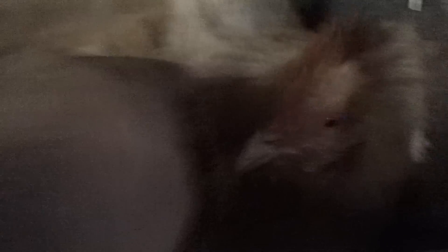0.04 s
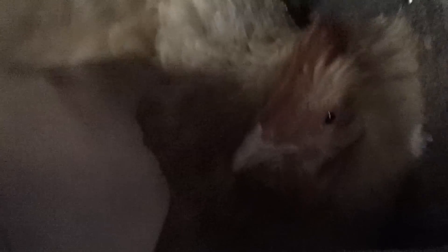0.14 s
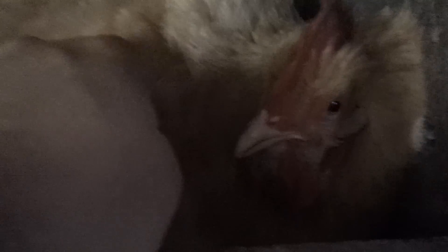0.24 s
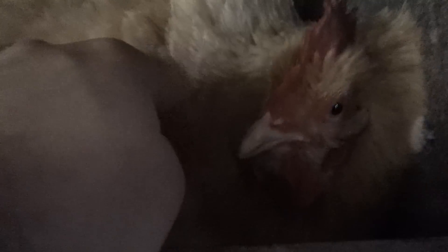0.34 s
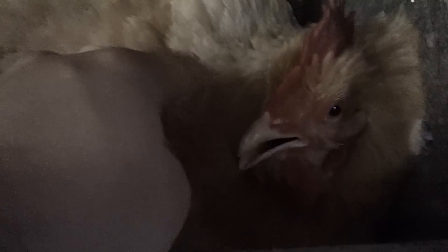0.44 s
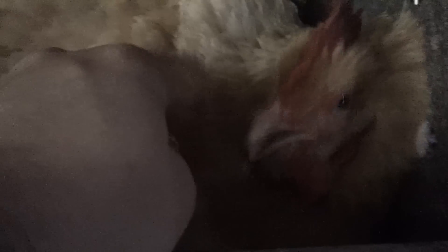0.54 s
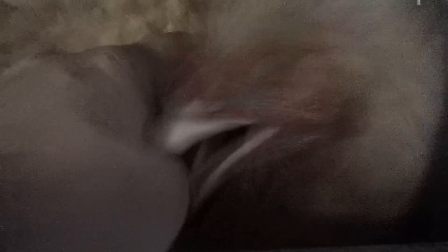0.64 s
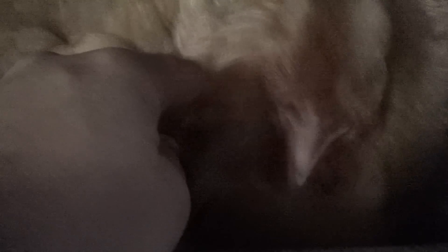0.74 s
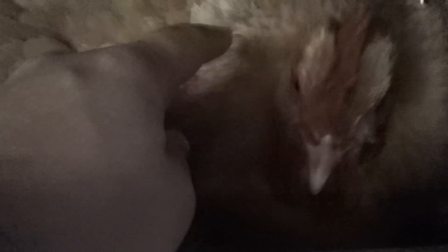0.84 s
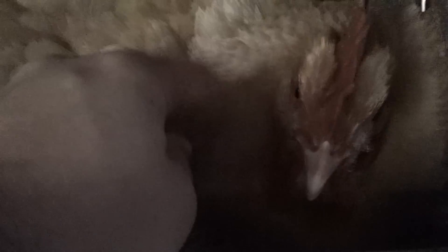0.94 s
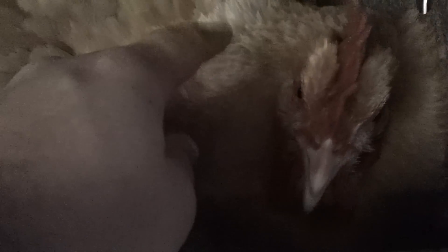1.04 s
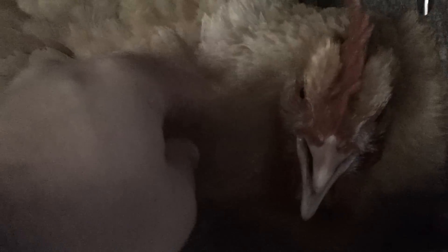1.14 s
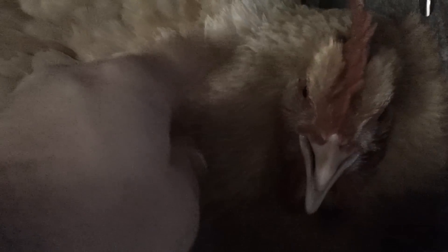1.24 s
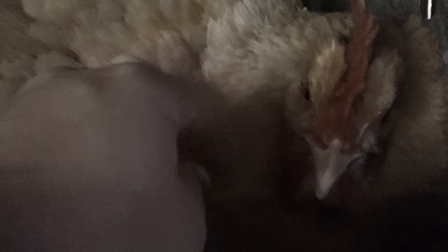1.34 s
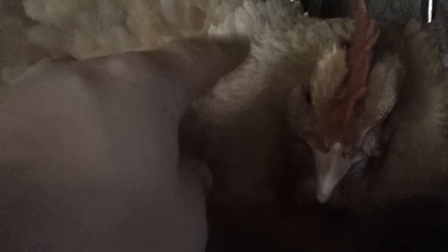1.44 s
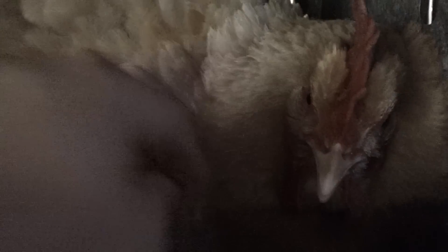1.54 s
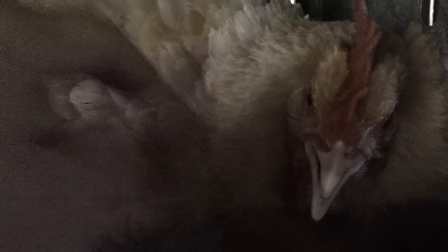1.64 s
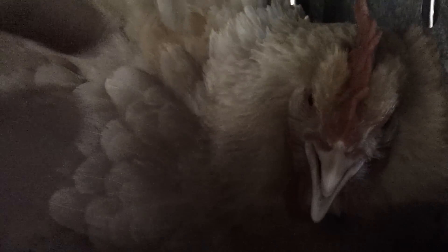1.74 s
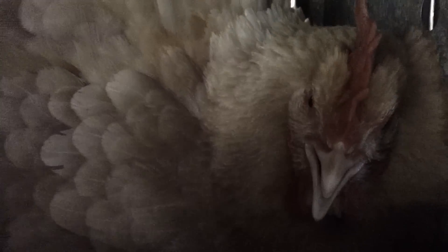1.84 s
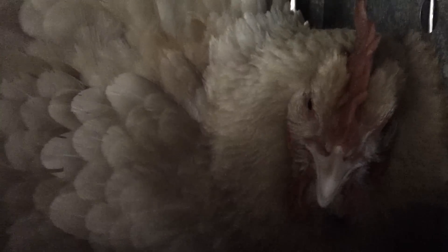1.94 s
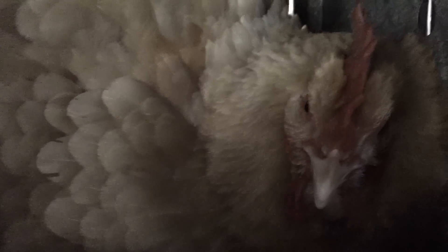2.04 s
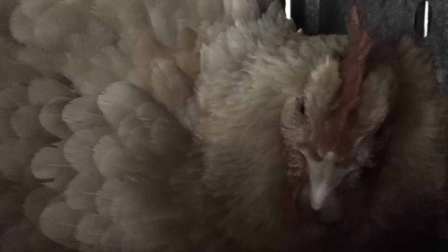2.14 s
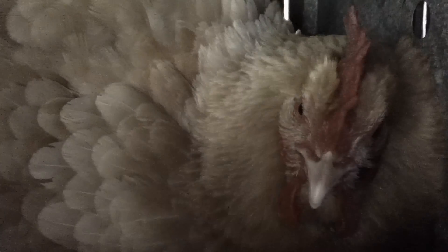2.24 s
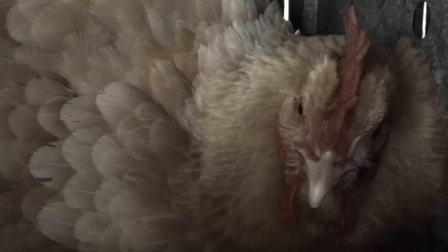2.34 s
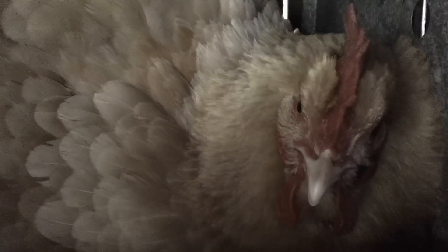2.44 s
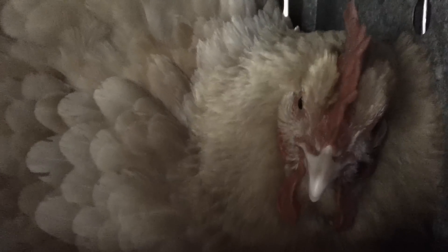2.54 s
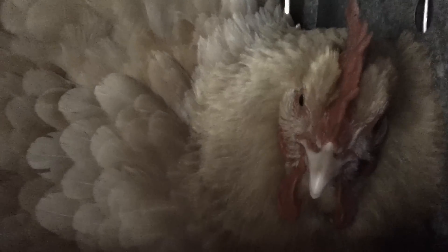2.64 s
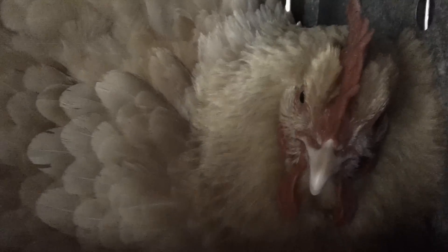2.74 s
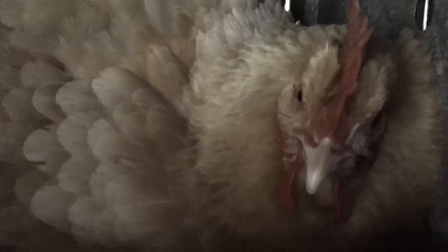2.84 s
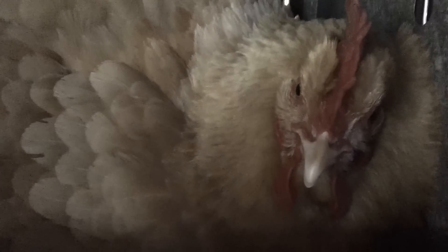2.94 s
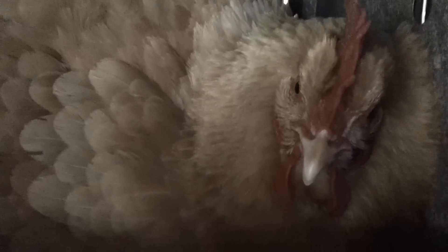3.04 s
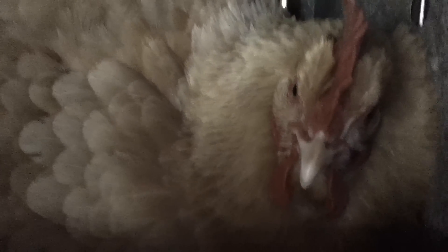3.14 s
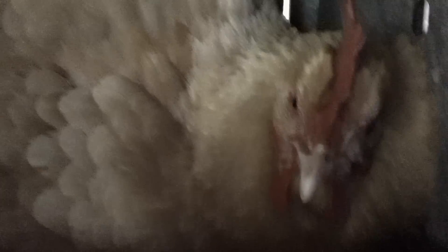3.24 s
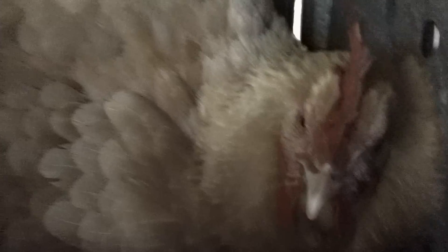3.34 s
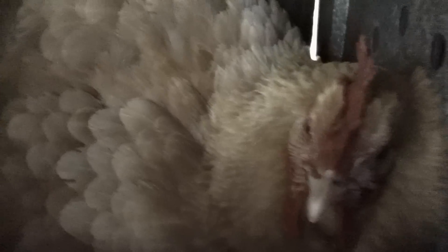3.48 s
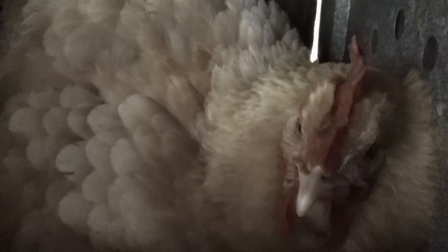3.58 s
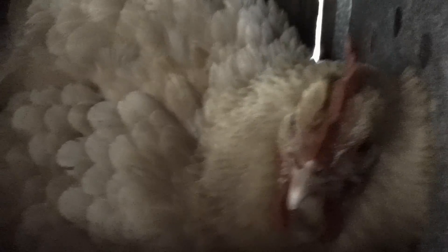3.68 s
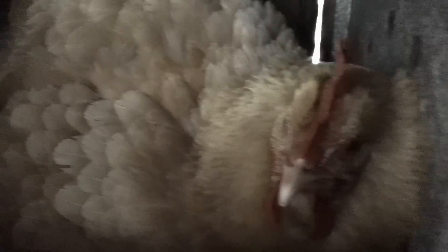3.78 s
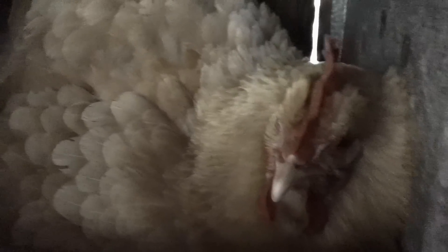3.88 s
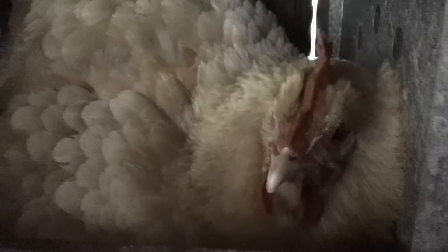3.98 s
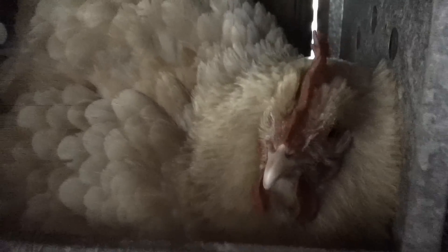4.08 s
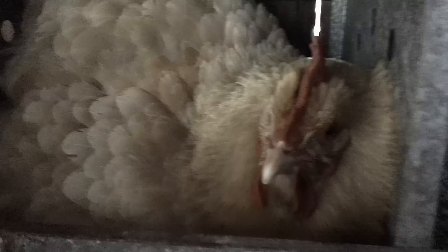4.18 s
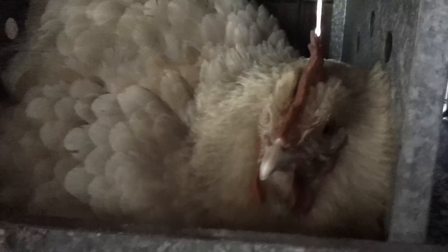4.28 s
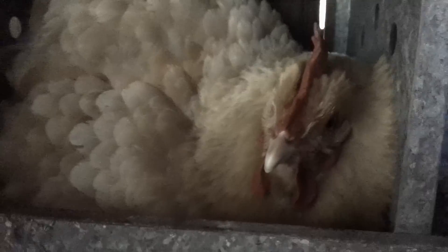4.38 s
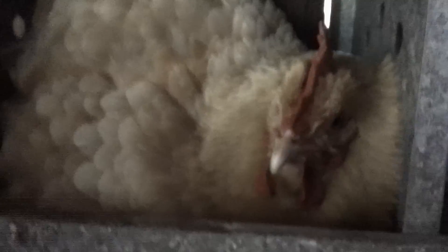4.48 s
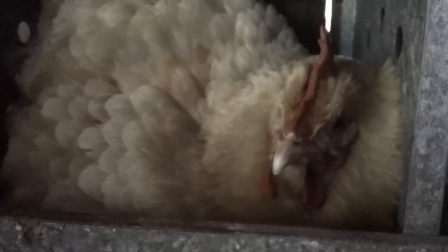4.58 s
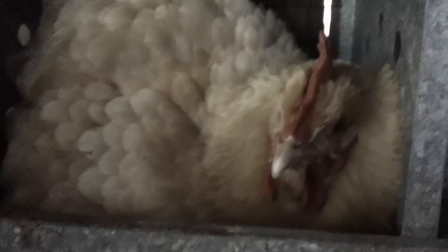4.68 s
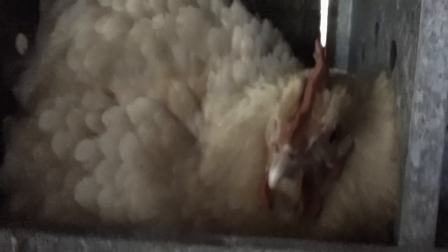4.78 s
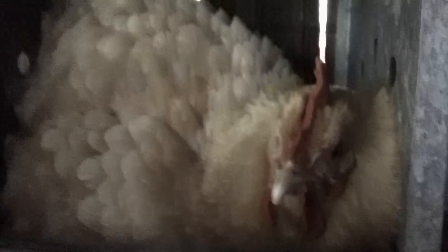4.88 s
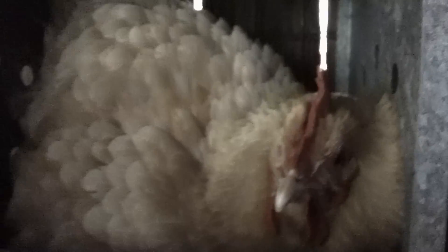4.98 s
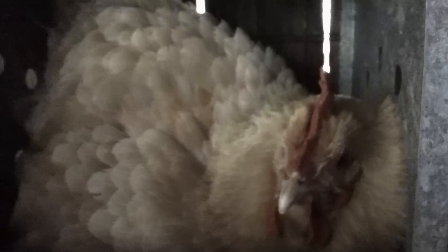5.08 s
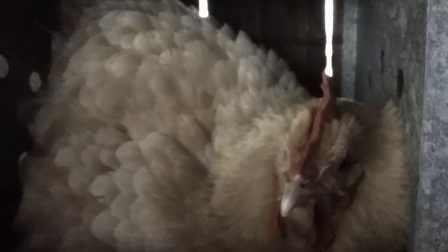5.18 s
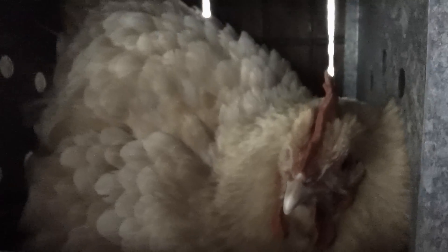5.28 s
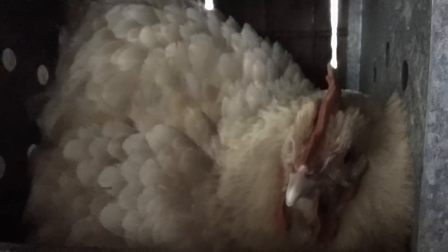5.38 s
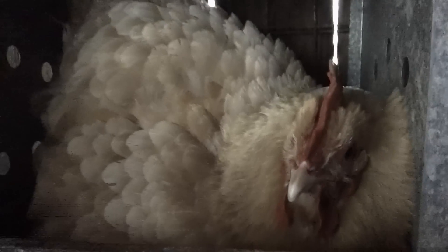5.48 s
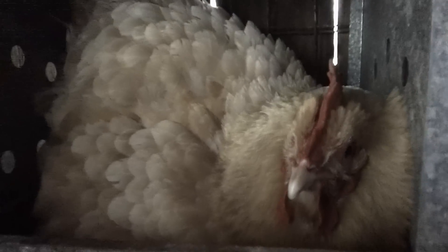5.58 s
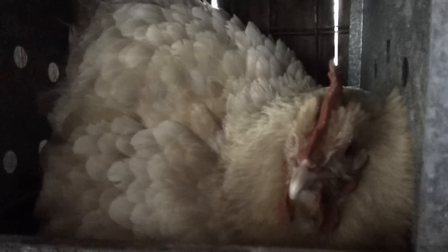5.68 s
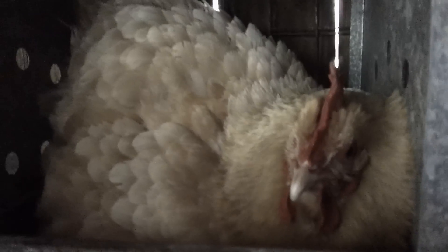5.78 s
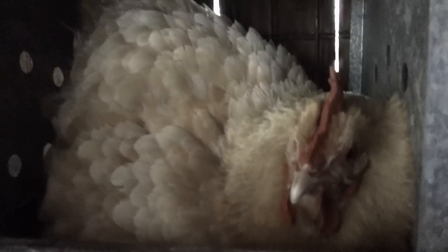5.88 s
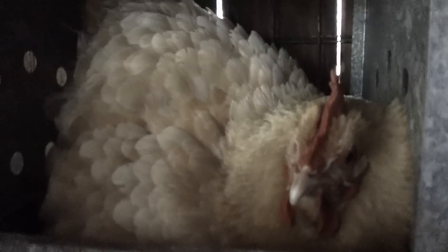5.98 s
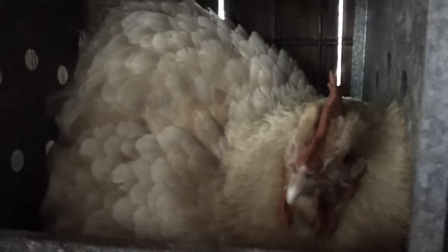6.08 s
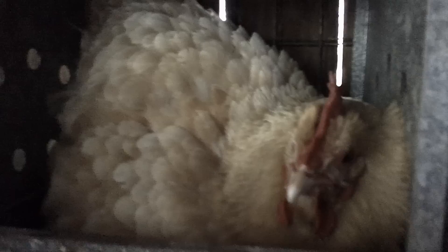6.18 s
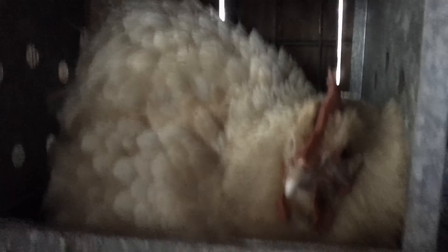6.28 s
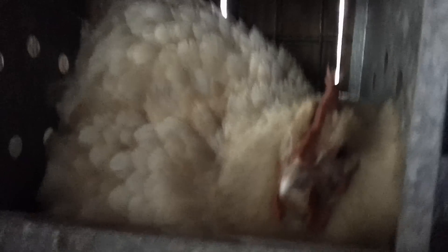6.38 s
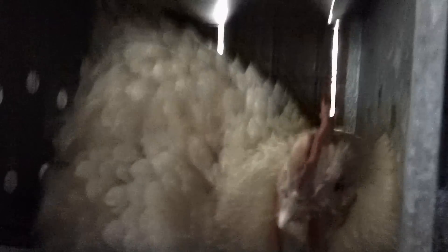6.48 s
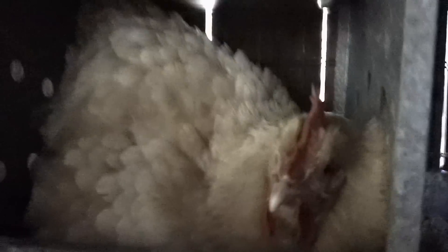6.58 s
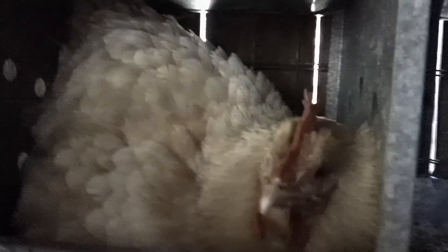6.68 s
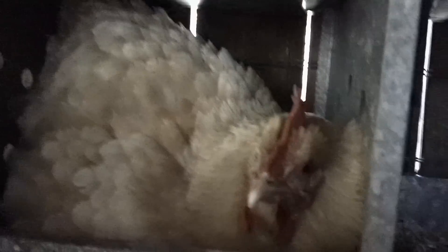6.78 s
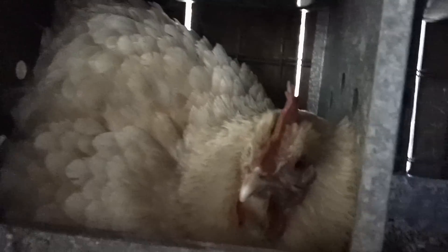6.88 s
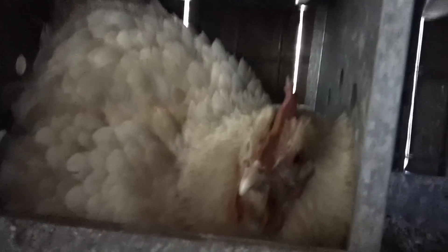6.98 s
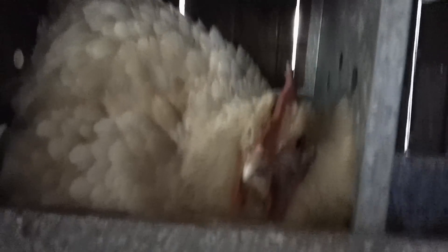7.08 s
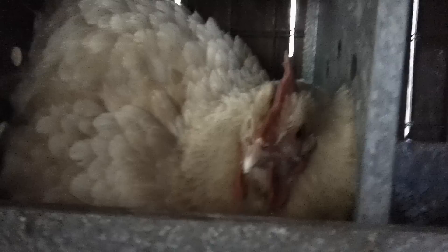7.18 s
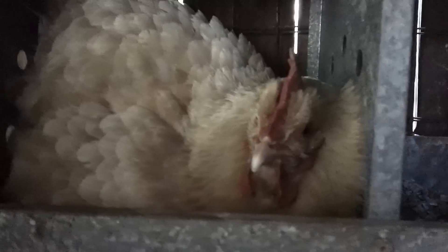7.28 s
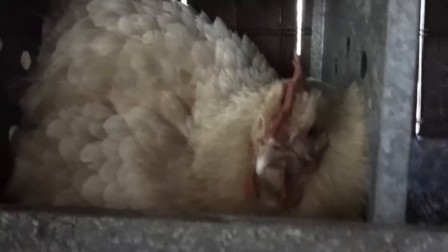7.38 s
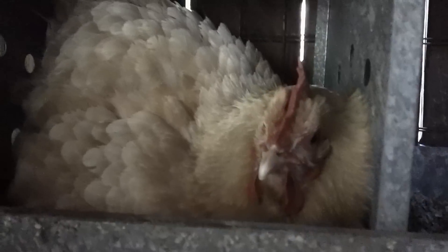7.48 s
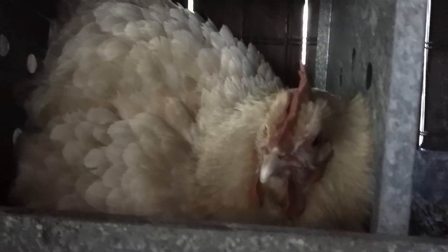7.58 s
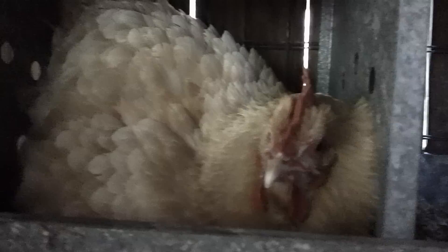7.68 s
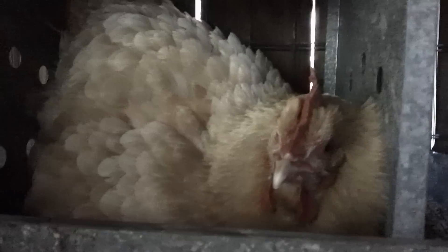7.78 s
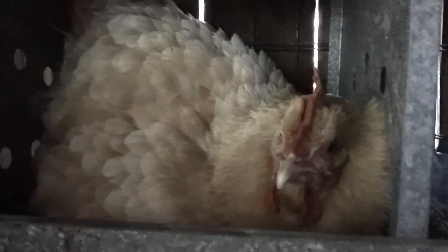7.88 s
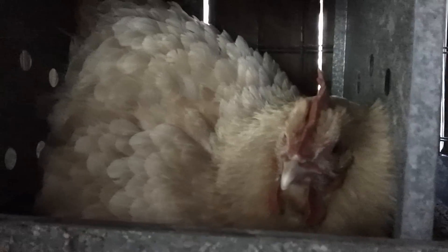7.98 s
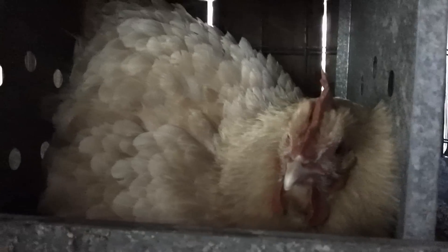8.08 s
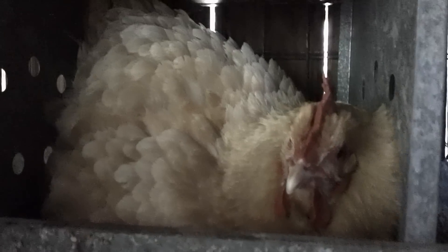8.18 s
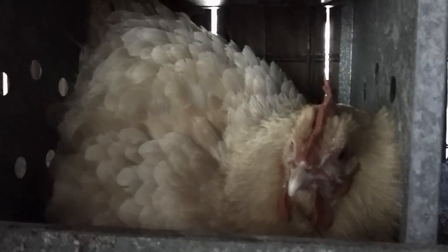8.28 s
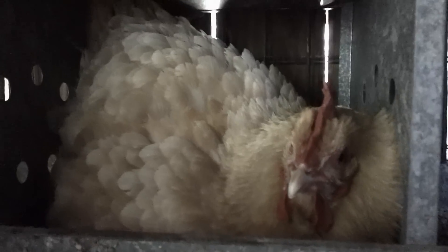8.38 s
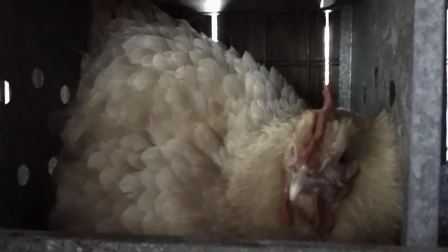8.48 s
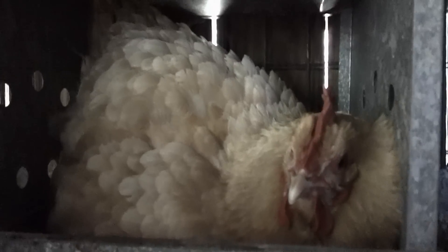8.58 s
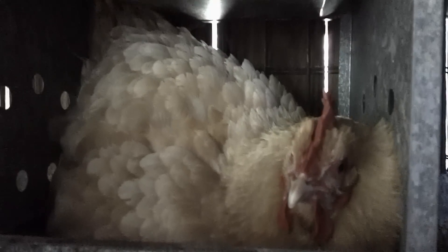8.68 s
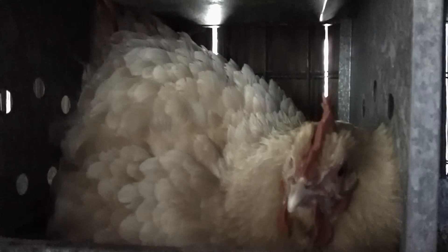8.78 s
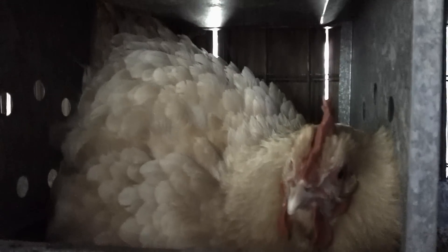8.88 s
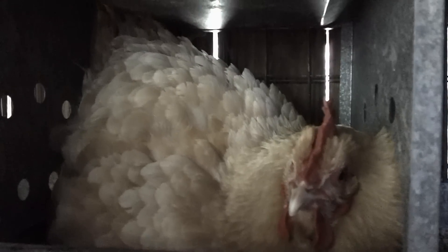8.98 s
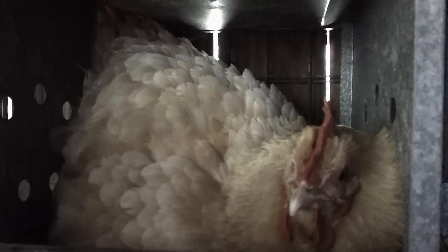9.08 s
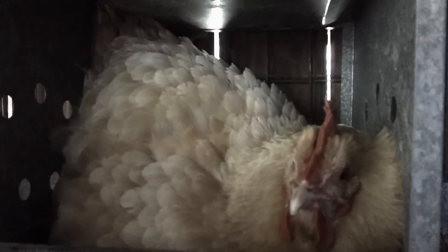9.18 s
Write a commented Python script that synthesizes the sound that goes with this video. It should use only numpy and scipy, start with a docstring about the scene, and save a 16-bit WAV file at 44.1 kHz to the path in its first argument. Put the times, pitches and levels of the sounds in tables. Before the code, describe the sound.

A broody hen hisses and scolds in three rapid bursts of throaty clucks close up, then settles as a low drone and distant birds remain.

```python
"""A broody hen in a sheet-metal nest box hisses at a hand while fingers rub the handheld camera and two motor
tones die away; she then scolds in three runs of rapid clucks, each a burst of pulses filtered by throat and box.
Gain control ducks after the loudest clucks. She settles as a motor drone of narrow-band noise swells and other
birds squawk hoarsely further off; hens croon in harmonic stacks and small birds chirp in quick glides.
Later the fingers rustle as grainy noise and tick as short resonant cracks."""
import sys
import numpy as np
from scipy import signal
from scipy.io import wavfile
from scipy.ndimage import uniform_filter1d

SR = 44100
rng = np.random.default_rng(int(sys.argv[2]) if len(sys.argv) > 2 else 0)


def to_wav(sig):
    """Store sig (one row per channel, or 1-D mono) as 16-bit WAV at the path in sys.argv[1].

    Samples outside -1..1 are clipped; the rate is SR.
    """
    pcm = np.clip(np.atleast_2d(sig), -1, 1) * 32767
    pcm = np.round(pcm).astype(np.int16)
    wavfile.write(sys.argv[1], SR, pcm.T)  # frames by channels


N = 407043  # length in samples

# Resonances of windpipe and beak. Each row: centre in Hz, bandwidth in Hz, level in dB,
# exponent by which the beak opening raises the centre (and, for the high ones, the level).
THROAT_MODES = [(336.2, 280, 0.5, 0.61), (557, 387, 7, 1.92), (1245, 177.1, 17.5, 0.846),
                (2311, 1140, -18, 1.49), (3234, 494, 3, 0.18), (4450, 300, -13, 0.042),
                (5740, 210, -5, 0.033), (7630, 230, -12, 0.073), (8860, 230, -25, 0.03),
                (11170, 740, -30, 0.056), (13600, 24000, -42, 0.2), (4300, 5700, -19, 0.05)]
HIGH_MODE_HZ = 1600  # modes above this are filtered twice and wander
WANDER_SHARE, WANDER_DB = .015, 1.5  # rms spread of a high mode's centre and level from call to call

# Hisses through the open beak. Each row: start in seconds, length in seconds, rms level in dB.
HISS_EVENTS = [(0, 0.056, -30), (0.04, 0.016, -34.5), (0.075, 0.12, -49), (0.668, 0.043, -40)]
HISS_SWELL_DB = 7  # rise from the start of the breath to its loudest point

# Fingers and feathers rubbing. Each row: start in seconds, length in seconds, dull rub in dB, thin scratch in dB.
RUB_STROKES = [(0, 0.11, -36.5, -43), (0.063, 0.17, -44, -61), (0.242, 0.27, -55.5, -53),
               (1.373, 0.17, -46, -56.5), (1.514, 0.15, -54, -41), (3.412, 0.21, -51, -59),
               (3.708, 0.9, -59, -66), (6.03, 0.73, -53, -66), (6.328, .25, -65, -52),
               (6.485, 0.025, -46.5, -47), (6.531, 0.02, -53, -38), (6.59, 0.058, -52.5, -40.5),
               (6.778, 0.13, -52.5, -48.5), (6.885, 0.17, -51, -68), (7.006, 0.11, -48.5, -45.5),
               (7.088, 0.15, -51.5, -41.5), (7.26, 0.08, -57.5, -54), (7.504, 0.12, -56, -52.5),
               (7.902, 0.078, -52, -50), (8.16, 0.12, -52, -53)]
# Spectrum of the dull rub. Each row: frequency in Hz, relative density in dB per Hz.
RUB_SPECTRUM = [(150, -32.5), (250, -3.5), (1620, -8.5), (2430, -4), (4530, -10), (6180, -9), (12500, -13),
                (16200, -48), (22000, -120)]
# Spectrum of the thin scratch. Each row: frequency in Hz, relative density in dB per Hz.
SCRATCH_SPECTRUM = [(4000, -27), (9000, -12.5), (12000, -11), (14500, 0), (16000, -5)]
# Fingernail and casing ticks. Each row: start in seconds, peak level in dB, ring frequency in Hz.
CASING_TICKS = [(0.0878, -15, 690), (6.4922, -21.5, 14000), (6.538, -22, 14600), (6.8, -26, 14700),
                (7.4395, -18, 6370), (7.4676, -31, 7500), (8.4387, -37, 9120), (8.5424, -25, 5130),
                (8.7475, -27, 4600), (8.7979, -27, 6560)]

# Steady air noise. Each row: frequency in Hz, relative density in dB per Hz.
AIR_SPECTRUM = [(15, -43), (25, -15), (59, -26), (122, -0.5), (198, -9), (366, -10.5), (1560, -20),
                (3400, -26.5), (8710, -30.5), (10800, -34), (12300, -33.5), (14100, -33), (15300, -35)]
AIR_DB = -48.5  # rms level

# Two clean motor orders, fundamental first. Each row: level at the start in dB, change in dB per second.
MOTOR_ORDERS = [(-40, -26), (-45.5, -3.5)]
ORDER_HZ, ORDERS_END_S = 73, 1  # first order and the moment when both are gone
# Level of the upper drone. Each row: time in seconds, rms level in dB.
DRONE_LEVEL = [(0.9, -70), (1.7, -68), (2.3, -56), (3.45, -53.5), (4.5, -55), (9.23, -54.5)]
# Pitch of the upper drone. Each row: time in seconds, frequency in Hz.
DRONE_GLIDE = [(3.5, 128), (4.6, 114), (5.6, 115.3), (7.2, 123), (8.3, 117.5), (9.0, 105)]
LOW_DRONE_HZ, LOW_DRONE_DB = 68.2, 1.5  # the lower drone stands this far above the upper
# Mains hum. Each row: frequency in Hz, rms level in dB.
MAINS_HUM = [(60, -69), (120.5, -54.5)]

# Membranes snapping apart ahead of a cluck. Each row: start in seconds, peak level in dB, brightness 0-1.
SNAP_EVENTS = [(0.454, -12, 0.22), (0.491, -22, 0.17), (0.568, -20, 0.8), (0.627, -15.5, 0.6),
               (0.683, -11.5, 0.58), (0.747, -15.5, 0.56), (1.185, -22.5, 0.75), (1.242, -12, 0.76),
               (1.294, -25, 0.4), (1.414, -22, 0.66), (1.801, -15, 0.7), (1.86, -15.5, 0.9),
               (1.914, -17, 0.9), (1.976, -19, .6)]
# Clucks. Each row: start in seconds, length in seconds, place of the peak 0-1, peak level in dB,
# pitch at the start in Hz, pitch at the end in Hz, roughness 0-1, beak opening as a factor on the throat.
CLUCK_EVENTS = [(0.505, 0.011, 0.24, -15.5, 810, 700, 0.11, 0.61),
                (0.516, 0.013, 1, -7.5, 606, 510, 0.33, 0.79),
                (.576, 0.012, 0.4, -5, 655, 611, 0.11, 0.805),
                (0.636, 0.015, 0.55, -13.5, 900, 1034, 0.06, 1.2),
                (0.679, 0.017, 0.18, -9.5, 539, 691, 0.1, 1.28),
                (0.75, 0.0279, 0.09, -4.5, 750, 814, 0.37, 1.19),
                (.793, 0.036, 0.35, 3.5, 432, 540.7, 0.34, 1.11),
                (0.852, 0.044, 0.17, -4.5, 384, 432, 0.11, 0.81),
                (0.914, 0.033, 0.24, -6, 203.7, 265.5, 0.2, 0.6),
                (1.187, 0.014, 0.1, -12.5, 1166, 1050, 0.15, 1.1),
                (1.198, 0.014, 0.4, -9.5, 977, 1017, 0.1, 1.15),
                (1.249, 0.02, 0.23, -5, 908, 670, 0.3, 1.06),
                (1.298, 0.028, 1, -0.5, 846, 611, 0.11, 0.955),
                (1.357, 0.024, 0.31, -0.5, 416, 346.3, 0.17, 0.81),
                (1.742, 0.03, 0.74, -19.5, 960, 730, 0.17, 1.26),
                (1.803, 0.023, 0.74, -3, 787, 652, 0.31, 0.98),
                (1.864, 0.018, 0.32, -4.5, 752, 615, 0.42, 1.02),
                (1.916, 0.024, 0.32, -2.5, 613, 562.6, 0.33, 0.88),
                (1.981, 0.024, 0.35, -2, 330, 361, .12, 0.78)]
GLIDE_CURVE = .65  # under 1: most of the glide comes early
SAG, RELEASE_S = 0.35, 0.00404  # share of the level lost after the peak, then a quick stop
BEAT_DEPTH_PER_ROUGH, BEAT_RATIO = 0.72, .49  # depth per unit of roughness, beat rate as a share of the pitch
TILT_LOUD_DB, TILT_PER_DB = 2.02, 0.54  # dB per harmonic octave at 0 dB, and its change per dB of level
TILT_PER_BEAK_DB = -8  # a wide beak darkens the pulses
TILT_PER_SWELL_DB = 4.5  # the treble gathers at the peak of each cluck
# Ringing of the nest box. Each row: frequency in Hz, decay time in seconds (a fall of 136 dB), level in dB.
BOX_MODES = [(597, 0.48, -3), (1210, 0.011, -9), (3374, 0.042, -6.5)]

# Hoarse squawks of other birds. Each row: start in seconds, length in seconds, level before the swell in dB,
# throat ring in Hz, centre of the rasp in Hz, ring share 0-1.
SQUAWK_EVENTS = [(2.115, 0.077, -39, 3040, 2490, 0.22), (2.178, 0.1, -26, 1175, 604, 0.46),
                 (2.44, 0.036, -30.5, 1150, 620, 0.47), (2.69, .035, -43, 2135, 3080, 0.4),
                 (3.246, 0.068, -35.5, 1065, 500, 0.4), (8.138, 0.042, -32.5, 3120, 2390, 0.52)]
RING_WIDTH_HZ = 260
RASP_WIDTH_HZ, RASP_WIDENING = 930, 0.39  # base width, and added width per Hz of its centre
# Far hens crooning. Each row: start in seconds, length in seconds, rms level before the fades in dB,
# pitch at the start in Hz, pitch at the end in Hz.
CROON_EVENTS = [(2.977, 0.4, -45, 216.7, 224.6), (3.332, 0.18, -50, 217.6, 204),
                (4.019, 0.013, -39.5, 1400, 1240), (4.161, 0.13, -52, 725, 752),
                (5.501, 0.058, -54, 1094, 1096), (5.83, 0.13, -53, 1105, 985),
                (6.687, 0.086, -54.5, 985, 1000), (7.273, 0.009, -41, 1350, 1350),
                (7.613, 0.0095, -43, 1053, 1010), (7.709, 0.044, -42, 241, 252),
                (9.044, 0.071, -41.5, 251, 235.6), (9.129, 0.15, -41.5, 240.8, 279)]
CROON_THROAT_HZ = 757.6  # a higher voice lifts the throat to its own pitch
# Small birds chirping. Each row: start in seconds, peak level before the hoarseness in dB,
# middle pitch in Hz, length in seconds.
CHIRP_EVENTS = [(3.142, -47.5, 3134, 0.033), (4.005, -46, 3260, 0.0368), (4.547, -50, 3840, 0.015),
                (4.569, -43, 3120, 0.011), (4.788, -43.5, 3280, 0.04), (5.02, -43.5, 3200, 0.022),
                (5.404, -45.5, 3470, 0.017), (5.774, -47, 3666, 0.032), (7.253, -48.5, 3190, 0.035),
                (9.08, -48, 3050, 0.019)]
CHIRP_LEVEL_HZ, CHIRP_GLIDE = 3375, 4.3  # lower chirps fall, higher ones rise: octaves of glide per octave

# Colour of the microphone. Each row: frequency in Hz, response in dB.
MIC_RESPONSE = [(11000, 2), (12200, -7.5), (12600, -31.5), (13100, -1), (14000, 2), (15300, 6),
                (15500, -36.5), (16500, -32)]
EDGE_HZ = 16550  # band limit


def gain_of(db):
    """Decibels are a logarithmic measure: 20 dB is a factor of ten in amplitude."""
    return 10 ** (np.asarray(db) / 20)


def evened(x):
    """Normalisation: dividing by the root mean square gives unit rms."""
    return x / np.sqrt(np.mean(abs(x) ** 2) + 1e-20)


def smoothed(length, span):
    """Low-pass noise: a running mean over span samples leaves the slow part of white noise."""
    return uniform_filter1d(rng.standard_normal(length), span)


def read(points, hz):
    """Spectral interpolation, linear in level along a logarithmic frequency axis."""
    f, value = np.transpose(points)
    return np.interp(np.log(hz + 1), np.log(f + 1), value)


def add(mix, s, sound):
    """Superposition: adds a sound into the mix at s seconds."""
    part = mix[round(s * SR):][:len(sound)]
    part += sound[:len(part)]


def resonate(x, hz, width):
    """Heterodyne resonance: shift hz to zero, smooth with one pole, shift back, with unit peak gain."""
    turn = np.exp(2j * np.pi * np.cumsum(hz * np.ones(len(x))) / SR)
    pole = np.exp(-np.pi * width / SR)
    smooth = signal.lfilter([1 - pole], [1, -pole], x / turn + 1e-18)
    return 2 * (turn * smooth).real


def resonate_twice(x, hz, width):
    """Cascaded resonance: two equal passes steepen the skirts."""
    return resonate(resonate(x, hz, width), hz, width)


def noise(points, patchy_db, apart):
    """Stereo noise by random short-time spectra with drifting patches; apart scales the unshared part."""
    frames, hz = N // 128 + 5, np.fft.rfftfreq(512, 1 / SR)
    a, b, c, d, patches = rng.standard_normal((frames, len(hz), 5)).T
    patches = evened(uniform_filter1d(uniform_filter1d(patches, 8, axis=0), 20, axis=1))
    spread = np.interp(hz, [250, 1000, 4000, 9000, 13000], [0.17, 0.24, 0.79, 1.34, 0.38])
    side = apart * spread[:, None] * (c + 1j * d)
    middle = a + 1j * b
    level = gain_of(read(points, hz)[:, None] + patchy_db * patches)
    spectra = np.array([middle + side, middle - side]) * level
    return evened(signal.istft(spectra, nperseg=512, noverlap=384)[1][:, :N])


def throat(drive, beak):
    """Source-filter principle: parallel windpipe and beak resonances, with 20 ms to die out."""
    drive, out = np.r_[drive, np.zeros(SR // 50)], 0
    wander = rng.standard_normal((len(THROAT_MODES), 2))
    for k, (hz, width, db, follow) in enumerate(THROAT_MODES):
        high = hz > HIGH_MODE_HZ
        hz = hz * beak ** follow * (1 + high * WANDER_SHARE * wander[k, 0])
        if high:
            mode = resonate_twice(drive, hz, width)
            mode *= beak ** (9.8 * follow) * gain_of(WANDER_DB * wander[k, 1])
        else:
            mode = resonate(drive, hz, width)
        sign = (-1) ** max(k, 1)  # the chest swings with the first throat mode
        out = out + sign * gain_of(db) * mode
    return out


def hiss(length, db):
    """Turbulence: thin, sputtering air excites the throat, loudest late in the breath."""
    count = round(length * SR)
    sputter = evened(smoothed(SR // 5, 200)[:count])
    air = np.diff(rng.standard_normal(count) * gain_of(2.5 * sputter), n=2)  # differencing thins the air
    swell = gain_of(-HISS_SWELL_DB * abs(np.linspace(-1, .4, len(air))))
    swell = swell * signal.windows.tukey(len(air), .25)
    return gain_of(db) * evened(throat(air * swell, 0.69))


def rubbing():
    """Stick-slip friction: fast slips make the dull rub and thin scratch noises grainy."""
    rub, scratch = np.zeros((2, N))
    for s, length, rub_db, scratch_db in RUB_STROKES:
        stroke = signal.windows.tukey(round(length * SR), .5)
        add(rub, s, gain_of(rub_db) * stroke)
        add(scratch, s, gain_of(scratch_db) * stroke)
    slips = evened(gain_of(2 * evened(smoothed(N, 150))))
    dull = rub * noise(RUB_SPECTRUM, patchy_db=1.5, apart=0.0043)
    thin = scratch * noise(SCRATCH_SPECTRUM, patchy_db=-3.5, apart=0.016)
    return slips * (dull + thin)


def motor():
    """Rotating machinery: two orders that die away, then drones of resonated noise, and mains hum throughout."""
    t = np.arange(N) / SR
    orders = np.zeros(N)
    for k, (db, change_db) in enumerate(MOTOR_ORDERS, 1):
        orders += gain_of(db + change_db * t) * evened(np.sin(2 * np.pi * k * ORDER_HZ * t))
    stop = np.clip((ORDERS_END_S - t) / 0.072, 0, 1)
    hum = sum(gain_of(db) * evened(np.sin(2 * np.pi * hz * t)) for hz, db in MAINS_HUM)
    upper_hz = np.interp(t, *np.transpose(DRONE_GLIDE))
    upper = evened(resonate_twice(rng.standard_normal(N), upper_hz, 35))
    lower = evened(resonate_twice(rng.standard_normal(N), LOW_DRONE_HZ, 29))
    level = gain_of(np.interp(t, *np.transpose(DRONE_LEVEL)))
    return level * (upper + gain_of(LOW_DRONE_DB) * lower) + stop * orders + hum


def ticks():
    """Impact: each tick is a brief noise crack together with the resonance it excites."""
    out, t = np.zeros(N), np.arange(400) / SR
    for s, db, hz in CASING_TICKS:
        crack = rng.standard_normal(len(t)) * np.exp(-t / 0.00045)
        sound = .5 * crack * min(hz / 6000, 1) + 3 * resonate(crack, hz, 970)
        add(out, s, gain_of(db) * sound / abs(sound).max())
    return out


def snap(db, bright):
    """Impulse excitation: a click and a short spit of air ring the throat."""
    t = np.arange(SR // 60) / SR
    spit = rng.standard_normal(len(t)) * np.exp(-t / 0.0012)
    click = (1 - t / 0.00013) * np.exp(-t / 0.00021) * 0.83
    dull = throat(click + .4 * spit, 0.67)
    sharp = throat(np.diff(click + spit, prepend=0), 0.79)
    sound = (1 - bright) * evened(dull) + bright * evened(sharp)
    return gain_of(db) * sound / abs(sound).max()


def cluck(length, place, db, hz0, hz1, rough, beak):
    """Self-oscillation: membrane pulses, beaten by a second membrane, with puffs of air in each cycle."""
    u = np.arange(round(length * SR)) / (length * SR)
    place = np.clip(place, .05, .95)
    swell = np.sin(np.pi / 2 * np.minimum(u / place, 1)) ** 0.91
    swell *= 1 - SAG * np.maximum(u - place, 0) / (1 - place)
    swell *= np.minimum((1 - u) * length / RELEASE_S, 1)

    # uneven cycles smear the high harmonics first
    wobble = (.1 + 1.5 * rough) * smoothed(SR // 5, 60)[:len(u)]
    middle_hz = (hz0 + hz1) / 2
    glide_hz = hz0 + (hz1 - hz0) * u ** GLIDE_CURVE
    turns = np.cumsum(glide_hz * (1 + wobble)) / SR

    k = np.arange(1, 15000 // middle_hz + 1)[:, None]  # harmonic numbers
    tilt_db = TILT_LOUD_DB + TILT_PER_DB * db + TILT_PER_BEAK_DB * (beak - 1)
    tilt_db = tilt_db + TILT_PER_SWELL_DB * (swell - 1)
    harmonics = gain_of(tilt_db * np.log2(k / 2)) * np.cos(2 * np.pi * k * turns)
    pulses = -harmonics.sum(0)
    beat = np.cos(2 * np.pi * BEAT_RATIO * middle_hz * length * u)
    pulses *= 1 + BEAT_DEPTH_PER_ROUGH * rough * beat

    air = rng.standard_normal(len(u))
    puffs = (.3 + np.exp(-(turns % 1) / 0.78)) * air * swell
    drive = swell * ((1 - rough) * evened(pulses) + rough * evened(puffs))
    sound = throat(drive, beak)
    return gain_of(db) * sound / abs(sound).max()


def hen():
    """Coupled resonators: all her hisses, snaps and clucks excite the ringing modes of the box."""
    out = np.zeros(N)
    for call, events in ((hiss, HISS_EVENTS), (snap, SNAP_EVENTS), (cluck, CLUCK_EVENTS)):
        for s, *row in events:
            add(out, s, call(*row))
    return out + sum(gain_of(db) * resonate(out, hz, 5.0 / decay_s) for hz, decay_s, db in BOX_MODES)


def squawk(length, db, ring_hz, rasp_hz, share):
    """Filtered turbulence: throbbing air is split between a throat ring and a broad rasp."""
    air = rng.standard_normal(round(length * SR))
    air = air * (1 + 0.123 * np.cos(2 * np.pi * 70 * np.arange(len(air)) / SR))  # throbs at 70 Hz
    swell = signal.windows.tukey(len(air), .4) * np.linspace(1, .5, len(air))
    ring = resonate_twice(air, ring_hz, RING_WIDTH_HZ)
    rasp = resonate_twice(air, rasp_hz, RASP_WIDTH_HZ + RASP_WIDENING * rasp_hz)
    return gain_of(db) * (share * evened(ring) + (1 - share) * evened(rasp)) * swell


def croon(length, db, hz0, hz1):
    """Voiced tone: a wavering harmonic stack is weighted by one throat peak."""
    waver = evened(smoothed(SR // 2, 600))[:round(length * SR)]
    hz = np.linspace(hz0, hz1, len(waver)) * (1 + 0.008 * waver)
    k = np.arange(1, 8)[:, None]  # harmonic numbers
    peak_hz = max(CROON_THROAT_HZ, hz.mean())
    weight = gain_of(-40 * np.log2(k * hz / peak_hz) ** 2)
    stack = (weight * np.sin(2 * np.pi * k * np.cumsum(hz) / SR)).sum(0)
    stack = stack * gain_of(4.3 * waver[::-1])  # the level wavers too
    return gain_of(db) * evened(stack) * signal.windows.tukey(len(hz), .6)


def chirp(db, hz, length):
    """Frequency modulation: a tone glides exponentially while random amplitude makes it hoarse."""
    glide = CHIRP_GLIDE * np.log2(hz / CHIRP_LEVEL_HZ)  # octaves
    u = np.linspace(-.5, .5, round(length * SR))
    hoarse = 1 + .8 * evened(smoothed(SR // 10, 40))[:len(u)]
    tone = np.sin(2 * np.pi * np.cumsum(hz * 2 ** (glide * u)) / SR)
    return gain_of(db) * hoarse * tone * np.cos(np.pi * u)


def far_birds():
    """Superposition of distant voices: squawks, croons and chirps, each at its own time."""
    out = np.zeros(N)
    for call, events in ((squawk, SQUAWK_EVENTS), (croon, CROON_EVENTS), (chirp, CHIRP_EVENTS)):
        for s, *row in events:
            add(out, s, call(*row))
    return out


def coop(x, t60):
    """Reverberation: sparse reflections of random sign, one in every 20 samples, fall 60 dB in t60 seconds."""
    at = np.arange(300, SR // 2, 20)
    at = at + rng.integers(0, 20, len(at))
    taps = np.zeros(SR // 2 + 20)
    taps[at] = rng.choice([-1., 1.], len(at)) * gain_of(-60 * at / SR / t60)
    return signal.fftconvolve(x, taps / np.linalg.norm(taps))[:N]


def scene():
    """Direct-to-reverberant ratio: the near hen has little room, far birds much; air, motor and hands are dry."""
    near, far = hen(), far_birds()
    near = near + gain_of(-24.5) * coop(near, 0.28)
    far = far + gain_of(-5) * coop(far, 0.31)
    air = gain_of(AIR_DB) * noise(AIR_SPECTRUM, patchy_db=1.5, apart=0.26)
    return near + far + air + motor() + rubbing() + ticks()


def record(dry):
    """Level compression by lagging gain control, then linear filtering by microphone and band limit."""
    power_db = 10 * np.log10(abs(uniform_filter1d((dry ** 2).mean(0), 900)) + 1e-12)
    fall = np.arange(N) * 9.6 / SR  # the held level falls this many dB a second
    held_db = np.maximum.accumulate(power_db + fall) - fall
    over_db = np.maximum(held_db + 19.5, 0)  # excess over a threshold of -19.5 dB
    late_db = signal.lfilter([1 / 2500], [1, 1 / 2500 - 1], over_db)  # lags by 2500 samples
    ducked = dry / gain_of(0.99 * late_db)
    rumble_cut = signal.butter(2, 45, "highpass", fs=SR, output="sos")
    ducked = signal.sosfilt(rumble_cut, ducked)
    hz = np.linspace(0, SR / 2, 513)
    colour = signal.firwin2(511, hz, gain_of(read(MIC_RESPONSE, hz)) * (hz < SR / 2), fs=SR)
    edge = signal.firwin(511, EDGE_HZ, window=("kaiser", 9), fs=SR)
    return signal.oaconvolve(ducked, np.convolve(colour, edge)[None], "same")


dry = scene()
out = record(dry)
to_wav(out)
```